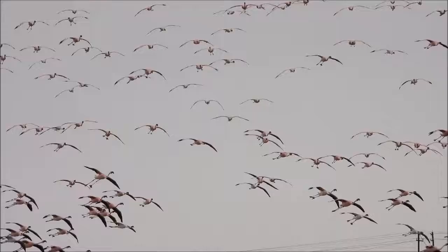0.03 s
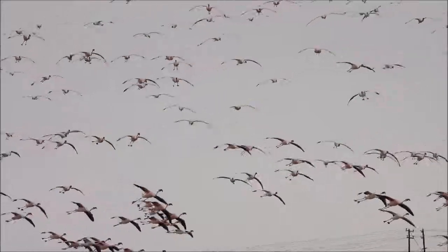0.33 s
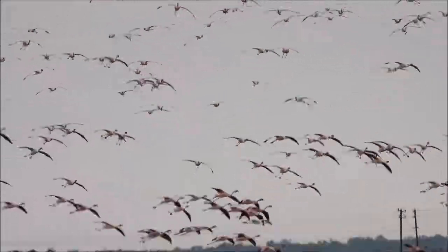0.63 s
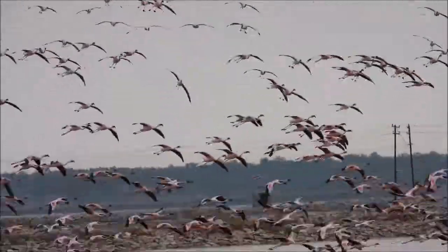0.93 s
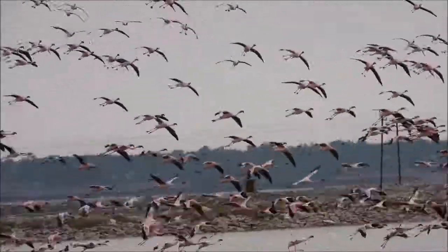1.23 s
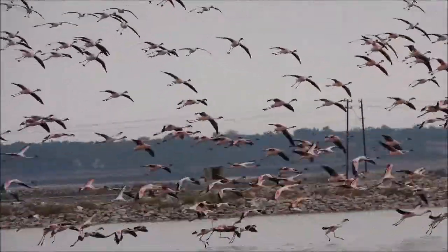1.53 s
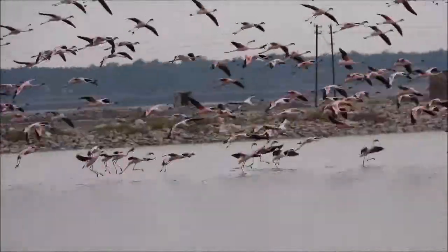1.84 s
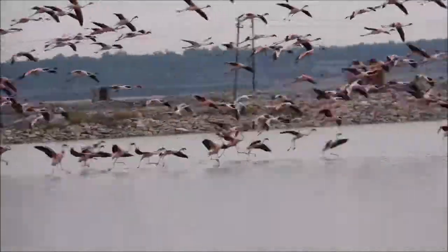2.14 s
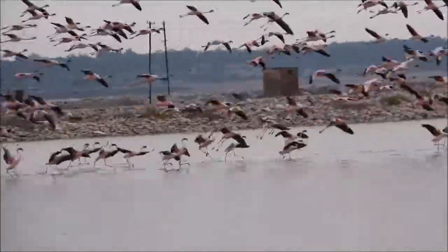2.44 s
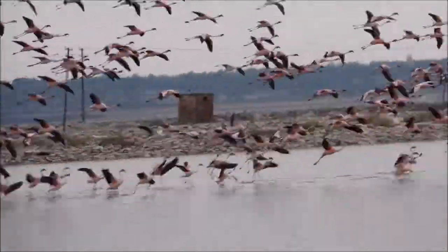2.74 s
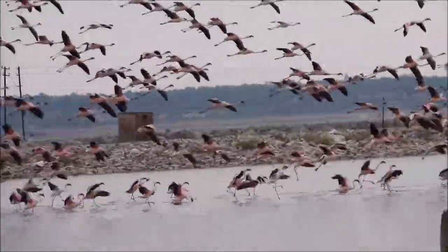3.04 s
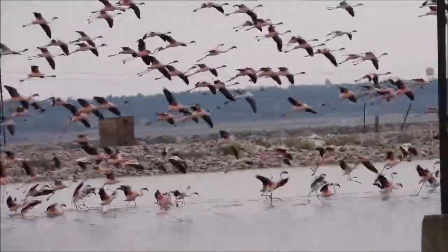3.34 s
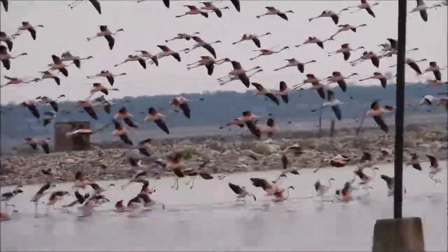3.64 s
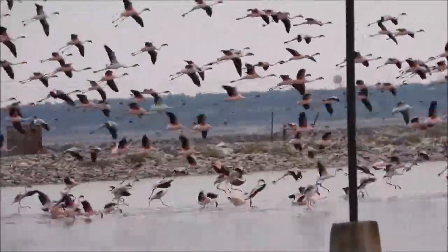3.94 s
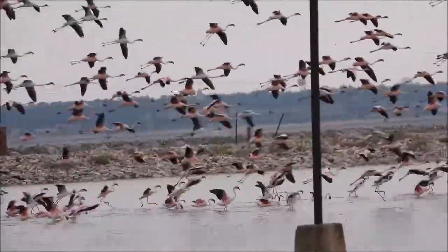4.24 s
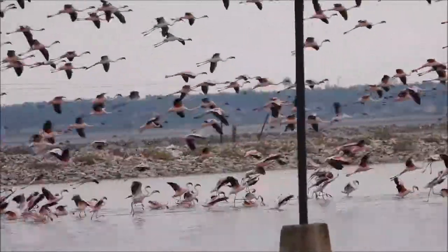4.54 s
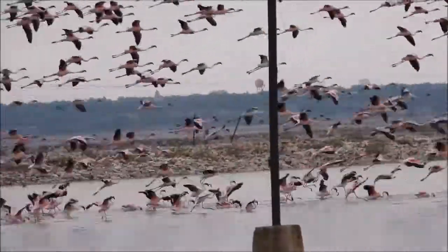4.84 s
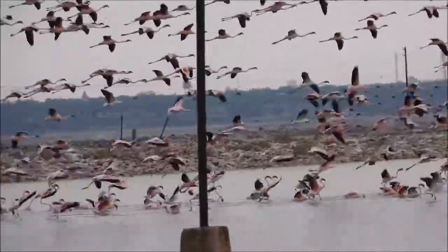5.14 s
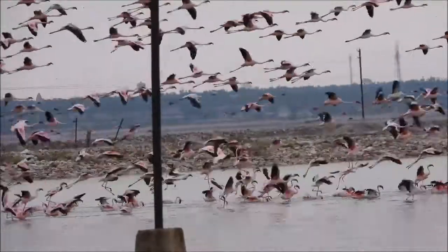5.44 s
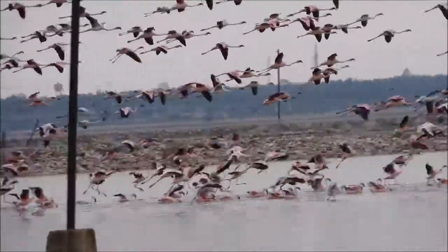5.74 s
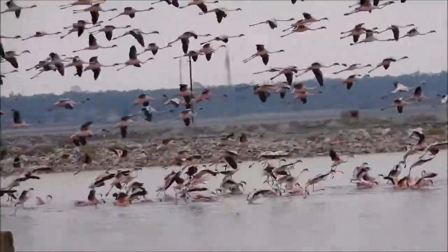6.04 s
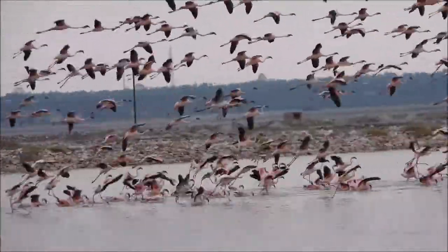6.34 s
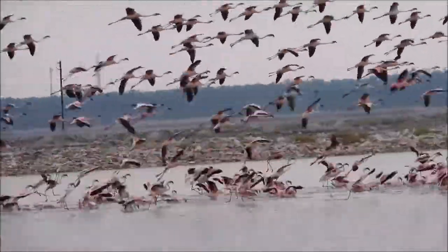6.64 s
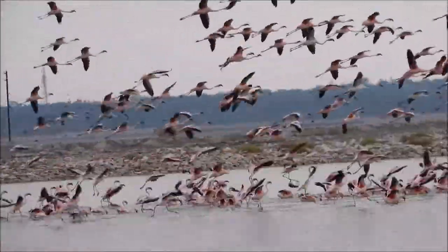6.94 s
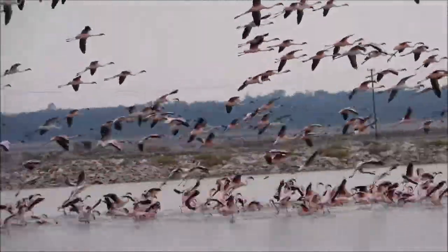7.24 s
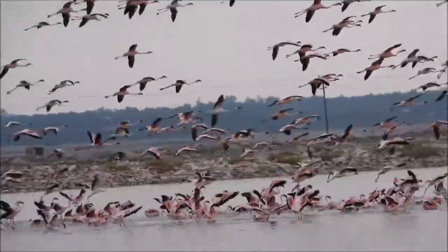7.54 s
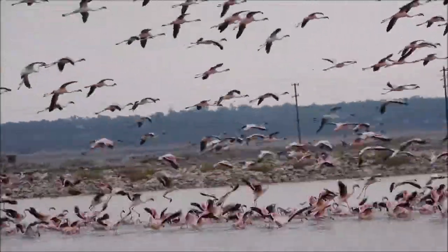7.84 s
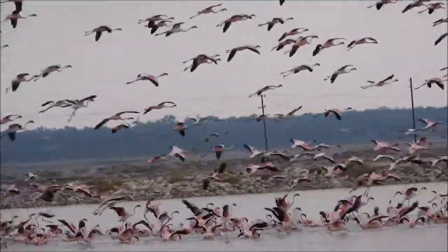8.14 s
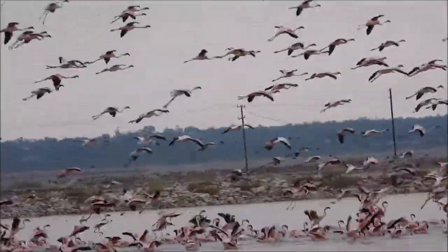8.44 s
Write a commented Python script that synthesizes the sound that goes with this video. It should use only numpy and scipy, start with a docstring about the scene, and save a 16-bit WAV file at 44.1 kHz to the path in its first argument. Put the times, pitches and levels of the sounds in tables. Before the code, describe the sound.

Wind buffets the microphone from the start, a low, fluttering rumble that is loudest in the first 0.3 seconds, along with a few clicks of the hand-held camera. It then settles into uneven puffs and brief lulls, with soft thumps around 0.5, 1.1, 4.4, 5.4, 5.8 and 7.5 seconds. Far behind it and much quieter, a large flock of flamingos lands in a shallow lagoon. Their nasal honks blend into a continuous murmur, swelling near 2 seconds and again from 4 to 7.5, over tiny squeaks and a faint hiss of churned water. Nearer birds give short, high peeps, chirps and rasps, clustered at the opening, around 2.2 seconds and most thickly from 5 to 7.5. A very faint thin whistle rises at about 1 second. Small camera ticks recur throughout, clearest at 6.2 seconds and at 8.2, where a stronger puff of wind arrives.

```python
"""Flamingos landing in a lagoon

A big flock comes down in the shallows, some way from a hand-held camera. Far off, nasal honks merge into a
murmur over the hiss of feet and wings churning the water; nearer birds peep, chirp, whistle and rasp. Right at
the microphone a gusty breeze buffets both ports and sharp clicks sound close by; the later ones are the camera
body ticking in the hand."""
import sys
import numpy as np
from scipy import signal
from scipy.fft import rfft, irfft, next_fast_len
from scipy.io import wavfile
from scipy.ndimage import uniform_filter1d, map_coordinates

SR = 44100
rng = np.random.default_rng(int(sys.argv[2]) if len(sys.argv) > 2 else 0)


def wav_record(signal):
    """Record a signal, one row per channel, as 16-bit PCM in the file named by sys.argv[1]."""
    frames = np.transpose(np.atleast_2d(signal))
    bounded = np.clip(frames, -1, 1)
    # unit amplitude maps onto the largest positive 16-bit level
    quanta = np.round(bounded * 32767).astype(np.int16)
    wavfile.write(sys.argv[1], SR, quanta)


N = 379260


def amp(db):
    """Decibels to gain."""
    return 10 ** (np.asarray(db) / 20)


def unit(x):
    """x scaled to rms 1."""
    return x / np.sqrt(np.mean(x ** 2) + 1e-20)


def along(points, hz):
    """(frequency, value) points read at hz on a log axis."""
    freqs, values = np.transpose(points)
    return np.interp(np.log(hz + 1), np.log(freqs + 1), values)


def curve(points):
    """(time, value) points joined into one value per sample."""
    return np.interp(np.arange(N) / SR, *np.transpose(points))


def wobble(rate):
    """A smooth random curve, rate knots a second."""
    knots = rng.standard_normal(int(N * rate / SR) + 4)
    return map_coordinates(knots, [np.arange(N) * rate / SR])


def bump(s, length):
    """A bell-shaped swell of height 1 around time s."""
    return np.exp(-(2 * (np.arange(N) / SR - s) / length) ** 2)


def filtered(x, response):
    """x through a gain that depends on frequency."""
    n = x.shape[-1]
    padded = next_fast_len(n + 8192)
    return irfft(rfft(x, padded) * response(np.fft.rfftfreq(padded, 1 / SR)), padded)[..., :n]


def coloured(x, spectrum):
    """x shaped by a spectrum, at rms 1."""
    return unit(filtered(x, lambda hz: amp(along(spectrum, hz))))


def spread(pair, side_db):
    """Two unrelated signals as middle and side of a stereo image."""
    mid, side = pair[0], pair[1] * amp(side_db)
    return np.array([mid + side, mid - side])


def panned(x, pan_db):
    """A sound leaning left by pan_db."""
    return amp([[pan_db / 2], [-pan_db / 2]]) * x


def add(track, s, sound):
    """Mix a sound into the track at time s."""
    part = track[..., max(0, round(s * SR)):][..., :sound.shape[-1]]
    part += sound[..., :part.shape[-1]]


# Breeze at the microphone: (time [s], level [dB])
BREEZE = [(0.14, -29.5), (0.25, -29), (0.29, -40), (0.6, -39.5), (0.7, -45.5), (1.7, -46), (2.09, -52),
          (2.24, -46.5), (2.84, -45.5), (2.99, -49.5), (3.79, -44), (5.1, -48.5), (5.89, -45), (6.5, -53.5),
          (7.31, -54), (7.69, -46.5), (8.09, -44.5), (8.6, -51)]
# Short puffs on top of it: (time [s], level [dB])
PUFFS = [(.38, -37), (.45, -36.5), (.545, -37), (0.778, -40), (.93, -39.5), (1.015, -40), (1.691, -43.5),
         (1.91, -42), (2.266, -41.5), (2.482, -39), (2.854, -38), (3.648, -43.5), (3.913, -41),
         (4.468, -42.5), (4.947, -46.5), (5.487, -40), (6.588, -46), (6.688, -47.5), (6.854, -42.5),
         (7.777, -43.5), (8.126, -36.5), (8.381, -41.5)]
# Moments when the wind drops away: (time [s], length [s])
WIND_LULLS = [(0.422, 0.015), (0.646, 0.019), (2.136, 0.036), (2.364, 0.046), (2.911, 0.037),
              (3.617, 0.012), (4.12, 0.02), (4.397, 0.024), (4.839, 0.014), (5.671, 0.07), (6.531, 0.068),
              (6.629, 0.085), (6.782, 0.027), (7.575, 0.051), (7.718, 0.062), (7.813, 0.029),
              (7.926, 0.047), (8.315, 0.018)]

def wind_strength(unrest_db=1.92, puff_s=0.053, lull_db=12.5):
    """Puffs add their power to the restless breeze; lulls cut it."""
    breeze_power = amp(curve(BREEZE) + unrest_db * wobble(30)) ** 2
    puff_power = sum((amp(db) * bump(s, puff_s)) ** 2 for s, db in PUFFS)
    lulls = sum(bump(s, length) for s, length in WIND_LULLS)
    return np.sqrt(breeze_power + puff_power) * amp(-lull_db * lulls)


# Turbulence in the microphone ports: (frequency [Hz], level [dB])
BUFFET_SPECTRUM = [(20, -47.5), (70, -26.5), (100, -27.5), (150, -10), (200, -1.5), (255, 1.5), (400, -3),
                   (570, -10.5), (800, -20.5), (1100, -29.5), (2000, -43.5), (6000, -66), (16000, -81.5)]

def wind(lump_db=2.0, flutter_db=1.0, patchy_db=3.5, deep_hz=230, usual_db=-45):
    """Eddies hit both ports at once but stir each apart; harder wind makes smaller, brighter eddies."""
    lumps = amp(lump_db * wobble(70) + flutter_db * wobble(170))
    spectra = signal.stft(lumps * rng.standard_normal((2, N)), nperseg=512)[2]
    patches = uniform_filter1d(rng.standard_normal(spectra.shape[1:]), size=3, axis=0)
    patches = unit(uniform_filter1d(patches, size=4, axis=1))
    turbulence = signal.istft(spectra * amp(patchy_db * patches), nperseg=512)[1][:, :N]
    ports = coloured(turbulence, BUFFET_SPECTRUM)
    slow_power = uniform_filter1d(np.mean(ports ** 2, axis=0), size=2400)
    ports = ports / np.sqrt(np.abs(slow_power))  # the wind alone sets the slow level
    deep = filtered(ports, lambda hz: 1 / (1 + (hz / deep_hz) ** 6))
    strength = wind_strength()
    deep_gain = (amp(usual_db) / strength) ** 0.49  # the bass swings about half as many dB
    return strength * (ports - deep + deep * deep_gain)


# Strong eddies striking the microphone: (time [s], level [dB], pitch [Hz])
EDDIES = [(.178, -20.5, 510), (.19, -17.5, 467), (.245, -18, 440), (0.547, -25, 340), (.61, -29, 324),
          (1.131, -25.5, 367), (2.252, -27.5, 306), (4.449, -28, 376), (5.373, -23, 338),
          (5.847, -25.5, 263), (6.73, -34.5, 265), (6.938, -32, 292), (7.518, -23, 382)]

def thumps(width_cycles=0.86, level_db=-1):
    """A strong eddy is a pressure swing of two or three cycles, out of step between the ports."""
    out, t = np.zeros((2, N)), np.arange(-3000, 3000) / SR
    for (s, db, hz), turn in zip(EDDIES, rng.random(len(EDDIES))):
        phase = 2 * np.pi * (hz * t + turn) + np.array([[0], [np.pi / 2]])
        swell = np.exp(-(hz * t / width_cycles) ** 2)
        add(out, s + t[0], amp(db + level_db) * swell * np.sin(phase))
    return out


# Sharp, close clicks, the first ones as the sound opens abruptly, the later ones the camera ticking in the
# hand: (time [s], level [dB], brightness [dB], treble lift [dB])
CLICKS = [(.139, -40, -18.5, 14), (0.172, -39, -27, 9.5), (0.205, -48, -15, 11.5), (.614, -50, -20, 20.5),
          (2.396, -47, -8.5, -20.5), (2.425, -57, -16, 23), (2.481, -42.5, -18, -1.5),
          (2.873, -48, -24.5, 15.5), (3.505, -43.5, -20, -10), (4.562, -41.5, -18, -11.5),
          (5.422, -45.5, -19, 17), (5.5, -49, -23.5, 17.5), (5.777, -48.5, -7, -16),
          (6.236, -35, -23, -3), (6.426, -48, -19.5, 15.5), (7.032, -39.5, -19.5, -10),
          (7.533, -46.5, -24, 14), (8.158, -30.5, -18, -7), (8.407, -55.5, -14, 22.5)]
# Modes of the camera's plastic shell: (frequency [Hz], level [dB], t60 [s])
SHELL_MODES = [(993, 3.5, 0.019), (1490, 1, 0.013), (1674, -0.5, 0.016), (2350, -20.5, 0.086),
               (3280, -14, 0.036), (4980, -10, 0.013), (6050, -24, 0.027)]
# Colour of a tick's crack: (frequency [Hz], level [dB])
CRACK_SPECTRUM = [(1500, -4), (5500, 3), (8000, -10.5), (11000, -22), (16000, -26)]
# Where the treble lift acts: (frequency [Hz], share [0-1])
LIFT_SHARE = [(6500, 0), (13000, 0.92)]

def ticks(ring_db=-8, crack_db=5, crack_t60=0.031, snap_db=7, snap_s=.0004):
    """Sharp clicks, the later ones the camera ticking in the hand: a snap, a brief crack and the short ring of
    its shell."""
    out, t = np.zeros((2, N)), np.arange(SR // 20) / SR
    snap = np.exp(-t / snap_s)
    crack_decay = amp(-60 * t / crack_t60) + amp(snap_db) * snap
    for s, db, bright_db, lift_db in CLICKS:
        ring = np.zeros(len(t))
        for mode_hz, mode_db, t60 in SHELL_MODES:
            decay = amp(mode_db + rng.normal(0, 4.2) - 60 * t / t60)
            ring += decay * np.sin(2 * np.pi * (mode_hz * t + rng.random()))
        ring *= (1 - snap) * amp(-.4 * max(0, bright_db + 23.5))  # bright ticks ring less
        crack = coloured(rng.standard_normal((2, len(t))), CRACK_SPECTRUM) * crack_decay
        crack = filtered(crack, lambda hz: amp(lift_db * along(LIFT_SHARE, hz)))
        crack = panned(spread(crack, side_db=2.0), pan_db=-6.0) * amp(bright_db + crack_db)
        add(out, s, amp(db + ring_db) * (ring + crack))
    return out


# Scatter from the banks of the lagoon: (frequency [Hz], t60 [s])
SHORE_DECAY = [(300, 0.45), (2000, 0.86), (8000, 0.2)]

def shore(calls):
    """The banks scatter the calls back, the treble dying first."""
    hz, t, spectra = signal.stft(rng.standard_normal((2, SR // 2)), SR, nperseg=256)
    decay = amp(-60 * t / along(SHORE_DECAY, hz)[:, None])
    tail = signal.istft(spectra * decay, SR, nperseg=256)[1]
    return signal.fftconvolve(calls, tail / np.linalg.norm(tail[0]), axes=1)[:, :N]


# Bustle out on the water: (time [s], level [dB])
BUSTLE = [(0.31, -72), (0.42, -69.5), (0.63, -82), (1.56, -82.5), (2.29, -72), (2.99, -83.5), (3.24, -77),
          (4.67, -76.5), (5.07, -73), (5.25, -74.5), (6.38, -69.5), (6.54, -80), (6.73, -78), (6.87, -69),
          (7.4, -77), (7.79, -85), (8.18, -74.5), (8.6, -82)]
# Hiss of distant spray: (frequency [Hz], level [dB])
SPRAY_SPECTRUM = [(1800, -8.5), (2600, -2.5), (3350, 4), (3900, 0), (5100, 0.5), (6400, -6), (7400, -19.5),
                  (16000, -35.5)]

def splashing(clump_db=3, spray_db=3.0, level_db=-7):
    """Far off to the right, feet and wings churn the shallows into clumps of fine spray."""
    clumps = amp(clump_db * wobble(40) + spray_db * wobble(900))
    spray = coloured(clumps * rng.standard_normal((2, N)), SPRAY_SPECTRUM)
    return amp(curve(BUSTLE) + level_db) * panned(spread(spray, side_db=-2.5), pan_db=-6.0)


# Gabble of the distant flock: (time [s], level [dB])
GABBLE_LEVEL = [(0.31, -67.5), (0.75, -73.5), (1.2, -75), (1.4, -70.5), (1.75, -73), (2.11, -61),
                (2.39, -70), (2.82, -65.5), (2.94, -76), (3.78, -72), (4.02, -65.5), (4.37, -68.5),
                (4.95, -64.5), (5.22, -66), (5.46, -62.5), (5.65, -67.5), (6.29, -66), (6.57, -70),
                (7.15, -65.5), (7.5, -63), (7.58, -71.5), (7.9, -71), (8.16, -68.5), (8.6, -70.5)]
# Resonance of the birds' throats: (frequency [Hz], level [dB])
THROAT_SPECTRUM = [(300, -15), (800, -4), (1100, 0.5), (1600, 2.5), (1820, 0), (2100, -13), (2550, -14),
                   (4500, -23.5), (8000, -54)]

def gabble(count=1100, pitch_hz=330, honk_s=.07, rough=0.74, level_db=1):
    """Far out and straight ahead, many short nasal honks overlap into a murmur."""
    honks = np.zeros((2, N))
    for k, (when, pitch, life, size, slide) in enumerate(rng.standard_normal((count, 5))):
        u = np.linspace(0, 1, int(SR * honk_s * np.exp(.3 * life)))
        arch = np.sin(np.pi * u)
        hz = pitch_hz * np.exp(.25 * pitch + .12 * slide * u + .1 * arch)
        pulses = np.diff(np.floor(np.cumsum(hz) / SR), prepend=0)  # one per cycle
        add(honks[k % 2], (k + when) / count * N / SR, amp(3 * size) * arch * pulses)
    voices = unit(honks) + rough * rng.standard_normal((2, N))
    flutter = amp(1.4 * wobble(160))
    murmur = coloured(voices * flutter, THROAT_SPECTRUM)
    return amp(curve(GABBLE_LEVEL) + level_db) * spread(murmur, side_db=-20)


def peep(length, hz, slide, arch, buzz=0, jitter=.007, buzz_hz=430, overtone_db=-18):
    """A sliding note, carried by its second harmonic at hz; an uneven flutter makes it hoarse."""
    u = np.linspace(0, 1, int(max(length, .005) * SR))
    shake, stumble = unit(uniform_filter1d(rng.standard_normal((2, len(u))), size=60))
    hook = (2 * u - 1) ** 2  # bends the pitch at both ends
    pitch = hz * (1 + slide * (u - .5) - arch * hook * (1 + hook) + jitter * shake)
    flutter = np.sin(2 * np.pi * np.cumsum(buzz_hz * (1 + .2 * stumble)) / SR)
    phase = 2 * np.pi * np.cumsum(pitch) / SR + buzz * flutter
    swell = np.abs(np.sin(np.pi * u)) ** .8 * (1 + .8 * np.tanh(buzz) * flutter)
    overtones = np.sin(1.5 * phase) + .7 * np.sin(2 * phase)
    return swell * (np.sin(phase) + amp(overtone_db) * overtones)


def far_peeps(count=640, pitch_hz=3900, level_db=-.5, burst_db=0.9, range_db=4, follows=.8):
    """Farther birds, mostly to the left, squeak over one another, louder when the water is busy."""
    out = np.zeros((2, N))
    for k, draws in enumerate(rng.standard_normal((count, 8))):
        when, life, pitch, slide, arch, hoarse, size, pan = draws
        hz = pitch_hz * np.exp(.38 * np.tanh(pitch))
        note = peep(.03 * np.exp(.4 * life), hz, slide=.03 + .1 * slide, arch=.03 + .03 * arch,
                    buzz=.5 * abs(hoarse), jitter=.01, overtone_db=-16)
        nearness = amp(range_db * np.tanh(size) - 2 * abs(pitch))
        add(out, (k + 2 * when) / count * N / SR, panned(nearness * note, pan_db=3.5 * pan + 3.0))
    bustle_db = curve(BUSTLE)
    chorus_db = follows * bustle_db + (1 - follows) * bustle_db.mean()
    return out * amp(chorus_db + level_db + burst_db * wobble(6.7))


# Faint whistles, straight ahead: (time [s], length [s], level [dB])
WHISTLE_CALLS = [(0.567, 0.23, -86), (1.078, 0.54, -82)]

def whistles(middle_hz=5780, rise_hz_per_s=3100, waver_db=5.0):
    """Long, thin notes climb steadily, fading in and out."""
    out = np.zeros((2, N))
    for s, length, db in WHISTLE_CALLS:
        add(out, s, amp(db) * peep(length, middle_hz, slide=rise_hz_per_s * length / middle_hz, arch=0))
    return out * amp(waver_db * wobble(18))


# Clear, arched notes: (time [s], pitch [Hz], slide [share of pitch], level [dB])
NEAR_PEEPS = [(.134, 3490, 0.03, -62.5), (.145, 5780, 0, -64), (.38, 2690, -0.045, -70),
              (.465, 3820, -.12, -69.5), (.472, 2550, 0.019, -67), (1.93, 6530, -0.034, -69),
              (1.935, 3320, 0, -69.5), (2.375, 3124, 0, -59.5), (4.254, 3210, 0.039, -67.5),
              (4.7, 3900, 0.054, -72), (4.96, 3750, .18, -65), (5.172, 4160, -0.074, -66.5),
              (5.253, 4170, -0.0017, -64), (5.735, 3366, -0.083, -62), (6.295, 2660, 0, -66),
              (6.738, 4100, -0.077, -67), (6.84, 3366, .06, -69.5), (7.32, 4530, -.14, -68),
              (7.452, 3610, .17, -63.5), (7.835, 3830, -0.019, -66.5), (7.926, 3440, .15, -66),
              (8.03, 3410, .05, -67)]
# Quick rising or falling notes: (time [s], pitch [Hz], slide [share of pitch], level [dB])
NEAR_CHIRPS = [(2.146, 4010, .35, -65), (2.285, 3290, -.25, -66.5), (3.867, 3300, -.3, -72),
               (5.605, 3330, -.42, -61), (5.677, 3500, -.45, -62.5), (5.975, 3600, .28, -67.5),
               (6.256, 3380, -.2, -69), (6.326, 3400, .25, -70), (6.37, 3320, -.25, -63),
               (6.595, 3530, .38, -69), (6.695, 3200, .3, -73.5), (6.823, 3470, .35, -64),
               (7.303, 3720, .38, -69), (8.497, 4300, .38, -71)]
# Short, dry clacks: (time [s], level [dB])
NEAR_CLACKS = [(.742, -72), (.772, -63.5), (.825, -65.5), (3.739, -68.5), (3.945, -68)]
# Hoarse calls: (time [s], length [s], pitch [Hz], slide [share of pitch], level [dB])
NEAR_RASPS = [(.349, 0.029, 3700, .2, -73), (.56, .046, 3800, 0.32, -71), (0.94, .046, 4430, .1, -72.5),
              (2.219, .05, 4000, -.2, -69), (2.29, .11, 5700, -0.14, -72), (3.455, 0.055, 4000, 0.014, -75),
              (3.56, .022, 4950, 0, -68), (4.37, .05, 4900, 0.24, -69), (4.853, .048, 4650, 0, -63),
              (4.989, .028, 4400, .15, -66), (5.079, .036, 4250, 0.38, -62.5),
              (5.1, 0.03, 3600, -0.04, -58), (6.33, .085, 5200, -0.07, -70), (6.439, .047, 3650, 0.17, -71),
              (6.497, 0.047, 3550, .1, -68), (6.85, 0.06, 4600, .35, -67), (6.95, .065, 3850, .35, -66.5),
              (7.114, .07, 4100, .3, -71), (7.263, .034, 3700, -.1, -64), (8.281, .065, 3730, 0.24, -71)]

def near_birds(peep_s=.055, chirp_s=0.025, clack_s=0.011, clack_hz=5460, voice_db=1):
    """The birds nearest the microphone, a little to the right, peep, chirp, clack and rasp."""
    notes = []
    for s, hz, slide, db in NEAR_PEEPS:
        arch = .04 * (.5 + rng.random())
        note = peep(peep_s, hz, slide, arch, buzz=.5 * rng.random(), overtone_db=-23)
        notes.append((s, db + voice_db, note))
    for s, hz, slide, db in NEAR_CHIRPS:
        notes.append((s, db + voice_db, peep(chirp_s, hz, slide, arch=0, buzz=.3, jitter=.015)))
    for s, db in NEAR_CLACKS:
        notes.append((s - clack_s / 2, db, peep(clack_s, clack_hz, slide=0, arch=0, buzz=.8, jitter=.16)))
    for s, length, hz, slide, db in NEAR_RASPS:
        notes.append((s, db + voice_db, peep(length, hz, slide, arch=.04, buzz=.8, jitter=.025)))
    out = np.zeros((2, N))
    for s, db, note in notes:
        add(out, s, panned(amp(db) * note, pan_db=rng.normal(-2.2, 2)))
    return out


# What reaches the microphone of a call across the lagoon: (frequency [Hz], gain [dB])
AIR_PATH = [(2000, 4.5), (3300, 1.5), (4500, -1), (6500, -4.5), (9000, -28.5), (14000, -34.5)]

def scene():
    """Birds and water in the distance, wind and clicks at the microphone."""
    calls = filtered(near_birds() + whistles() + far_peeps(), lambda hz: amp(along(AIR_PATH, hz)))
    lagoon = calls + amp(-13.5) * shore(calls) + gabble() + splashing()
    return lagoon + wind() + thumps() + ticks()


# Cavity behind the microphone ports: (frequency [Hz], gain [dB])
PORT_CAVITY = [(2020, 0.5), (2220, 6), (2450, -3), (2650, -2.5), (2900, 1), (3060, -2.5), (3370, 5),
               (3600, 0), (5000, -0.5)]

def record(dry):
    """The sound opens abruptly, takes the colour of the housing and loses its highest treble."""
    start_s, fade_s, top_hz = 0.138, .001, 15900
    opened = np.clip((np.arange(N) / SR - start_s) / fade_s, 0, 1)
    return filtered(dry * opened, lambda hz: amp(along(PORT_CAVITY, hz)) * (hz < top_hz))


dry = scene()
out = record(dry)
wav_record(out)
```